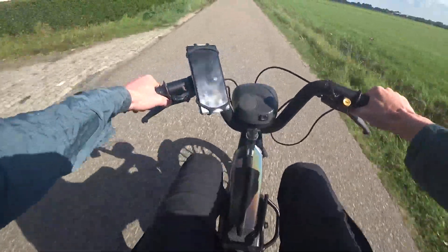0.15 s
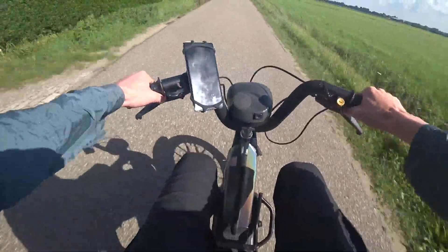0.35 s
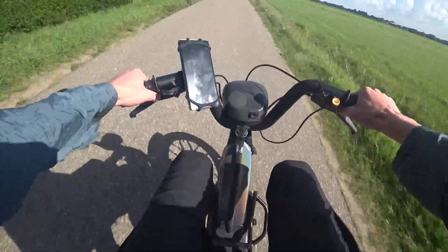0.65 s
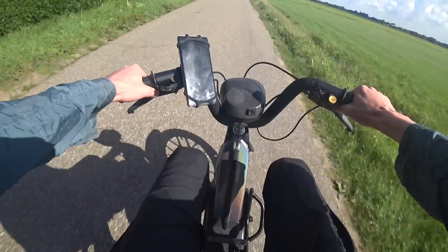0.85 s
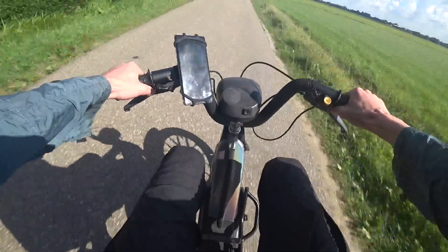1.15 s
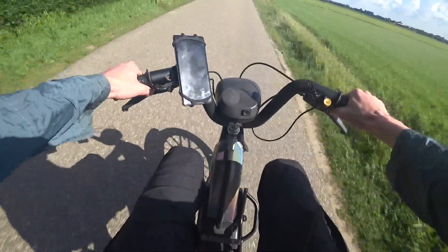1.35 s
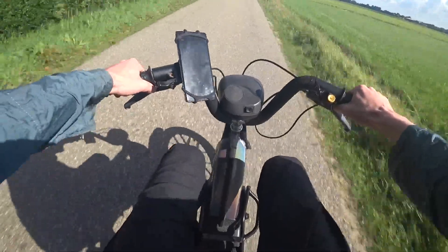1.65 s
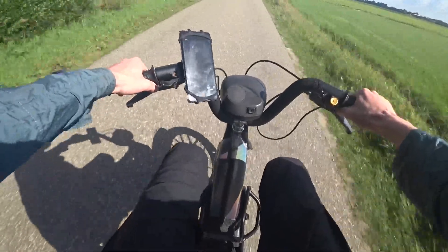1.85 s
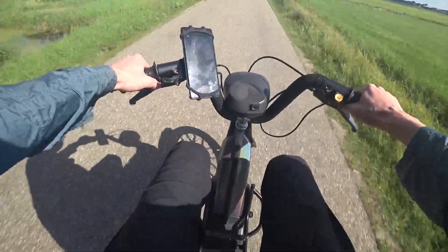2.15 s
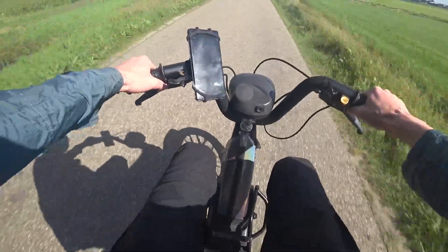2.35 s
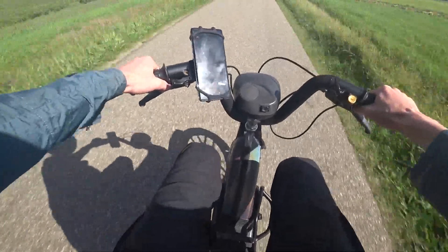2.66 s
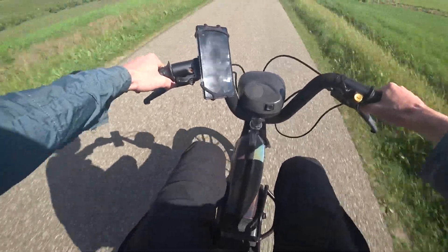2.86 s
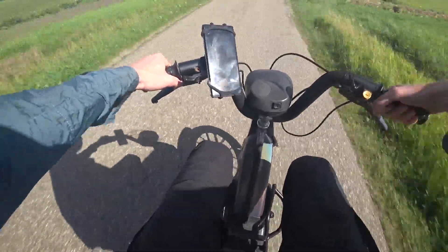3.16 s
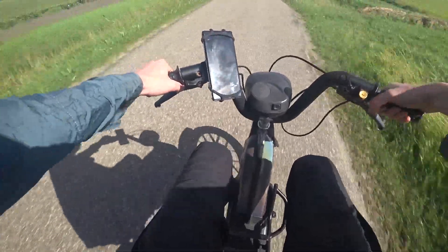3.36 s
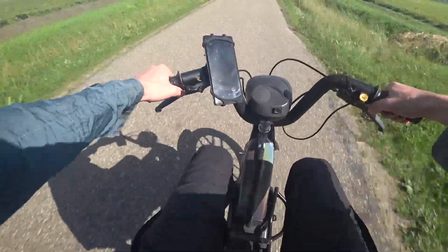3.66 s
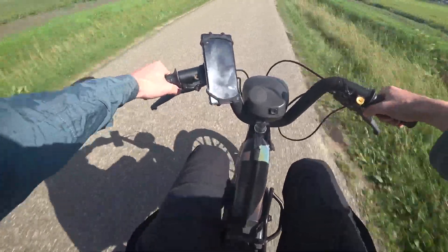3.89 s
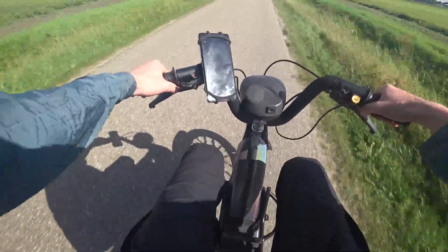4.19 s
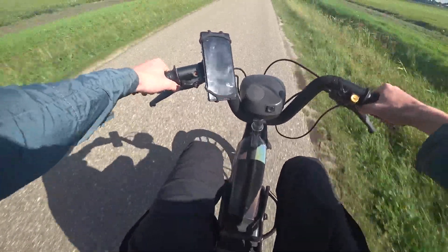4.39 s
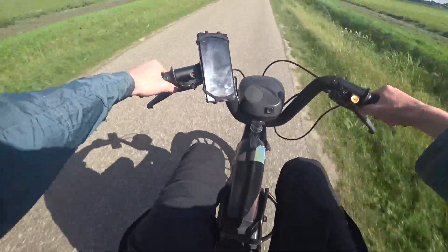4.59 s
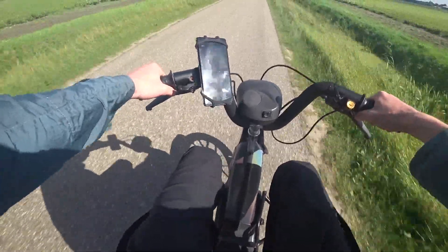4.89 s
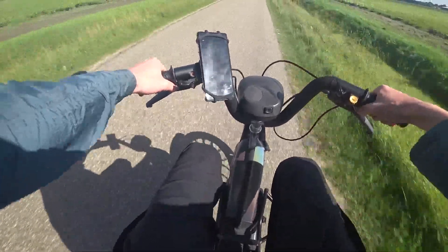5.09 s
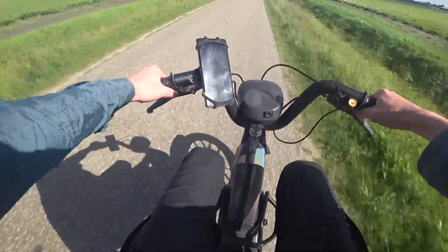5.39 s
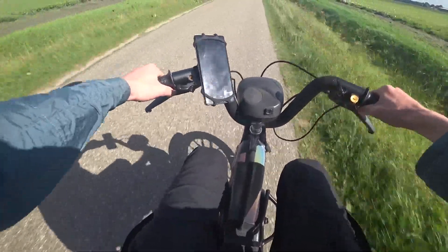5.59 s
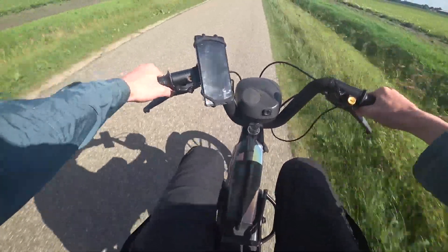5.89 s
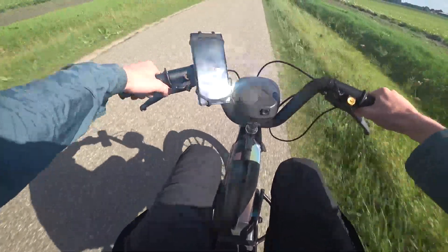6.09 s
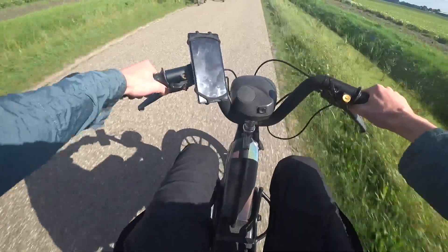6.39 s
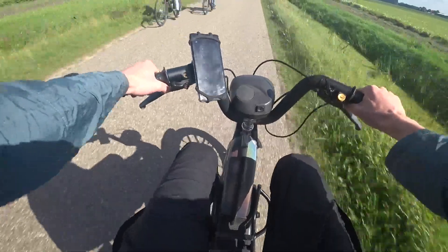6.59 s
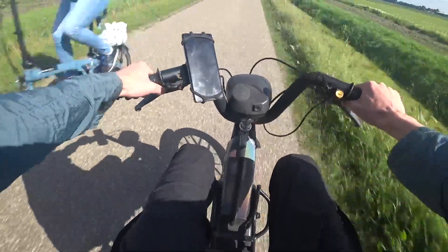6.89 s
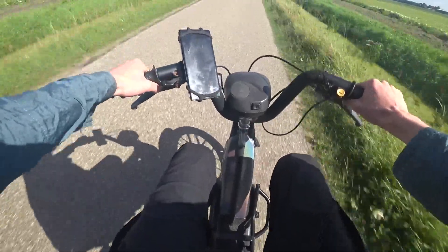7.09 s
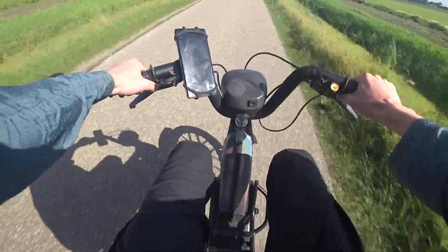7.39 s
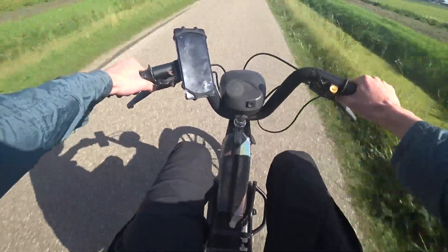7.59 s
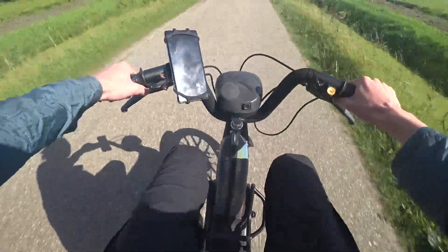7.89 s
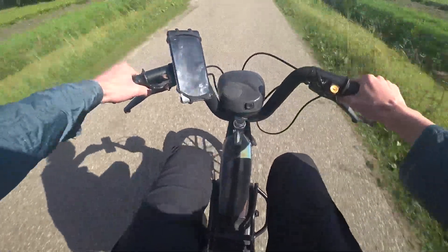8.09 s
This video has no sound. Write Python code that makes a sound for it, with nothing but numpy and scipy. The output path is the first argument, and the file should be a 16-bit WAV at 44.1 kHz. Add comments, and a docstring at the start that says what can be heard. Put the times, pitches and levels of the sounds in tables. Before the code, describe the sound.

A tuned two-stroke moped is heard from the rider's chest on an open path, close, dry and wide, with the engine sounding diffuse between left and right. From 0 to 3.1 s it holds a fast, nasal, buzzing drone, very slightly rising, with metallic rasp, hiss and a thin gear whine around 1.1 kHz. Deep wind rumble and blustery buffets push over it, strongest in the first two seconds. At about 3.2 s the throttle shuts: the exhaust fades and stumbles as the pitch drops quickly. Around 3.6 to 3.8 s it reopens with a few small, rough pops. A lower, duller note holds until about 6 s, in calmer but still rumbling wind. Gusts return from 5.8 s, with a soft low thump, while the revs climb and the bright rasp comes back by 7 s, staying steady, just below the opening pitch, to the end near 8.2 s.

```python
"""Narrow path, heard from a moped rider's chest: a tuned two-stroke runs flat out.
The throttle shuts briefly; revs sag, hold, climb again. Exhaust is summed firing harmonics plus gas noise,
the engine rasp is pulse-driven, the drive whines with road speed, wind is gusting coloured noise.
Two microphone ports, built from side and mid, hear most of it in opposite phase."""
import sys
import numpy as np
from scipy import signal
from scipy.fft import rfft, irfft, next_fast_len
from scipy.io import wavfile
from scipy.ndimage import map_coordinates

SR = 44100
rng = np.random.default_rng(int(sys.argv[2]) if len(sys.argv) > 2 else 0)


def generate_wav(sig):
    """Save sig (samples, or channels by samples) to the path in sys.argv[1] as 16-bit PCM at SR."""
    pcm = np.round(np.clip(np.atleast_2d(sig).T, -1, 1) * 32767).astype(np.int16)
    wavfile.write(sys.argv[1], SR, pcm)


N = 363811

# wind common to both ports: centre_hz, side_db, mid_db
RUMBLE_SPECTRUM = [(8, -12, 4), (15, -10, 7.5), (30, -9, 4), (55, -11, -4.5), (90, -16, -13),
                   (140, -25, -23), (220, -33, -29), (600, -50, -44), (2000, -80, -80)]
# wind differing between the ports: centre_hz, side_db, mid_db
BUFFET_SPECTRUM = [(15.4, -14, 5), (55, -3.5, -17), (90, 0, -27), (140, -7, -44), (220, -15.5, -36),
                   (503, -15, -63), (2000, -94, -90)]
# passing air: centre_hz, side_db, mid_db
RUSH_SPECTRUM = [(100, -32, -47), (215, -21, -31.5), (403, -18.5, -29), (615, -18, -27), (960, -10, -28.5),
                 (1300, -20, -40), (1600, -17, -30), (1890, -28, -36.5), (2580, -34, -41),
                 (5160, -36.5, -39.5), (11000, -55.5, -53)]
# low wind flutter: centre_hz, side_db, mid_db
FLUTTER_SPECTRUM = [(29.81, -42, -30), (81.6, -32, -9), (126, -24, -17.5), (214, -30, -25.5),
                    (350, -32, -26.5), (600, -50, -29.5), (2000, -80, -84)]
# flutter level: time_s, level_db
FLUTTER_LEVEL = [(0, -4.5), (1.8, -4.5), (3, 2), (3.6, -0.5), (5, 2), (7, -1.5), (8.25, -0.5)]
# gusts, levels before spectrum and trim: start_s, length_s, buffet_db, rumble_db
GUSTS = [(-.05, .2, 2, -14), (.15, 0.31, 8.5, -3), (0.752, 0.12, 5.5, -5), (1.2, 0.13, 6.5, -12),
         (1.32, 0.21, 11, -16), (1.693, 0.18, 7, -10), (2.59, .2, 3, -1.5), (2.85, 0.27, -7, -3),
         (4.35, 0.15, -9, 1), (5.24, .2, -4, -5), (5.79, 0.14, 3, 5), (6.118, .18, 7.5, -5),
         (6.48, .14, 5, -5), (6.793, 0.24, 10.5, -9), (7.056, 0.13, 5, -16), (7.68, 0.13, -2, 2),
         (7.801, 0.26, 4.5, 0.5), (8.153, 0.17, 3, 4)]
# low wind thumps: start_s, peak_db
THUMPS = [(1.97, -32), (2.44, -33), (4.16, -27), (5.87, -18), (6.92, -28.5), (7.52, -28)]
# road speed as gear mesh rate: time_s, mesh_hz
MESH_RATE = [(0, 1097), (.5, 1101), (2, 1134), (3.15, 1153), (4, 1110), (4.5, 1083), (5.3, 1062), (6, 1030),
             (7.6, 1044), (8.25, 1078)]
# single hard firings around the throttle reopening: start_s, peak_db
POPS = [(3.603, -28), (3.641, -22), (3.765, -25), (3.802, -27)]
# engine case and hiss: centre_hz, side_db, mid_db
RASP_SPECTRUM = [(1280, -25.5, -57), (2110, -28, -33.5), (2540, -35, -38), (2730, -51, -32.5),
                 (3330, -22.5, -39), (3770, -38.5, -40.5), (4990, -24, -26.5), (5550, -30, -26),
                 (5550, -20, -27.5), (6160, -36, -34.5), (6850, -37, -29.5), (7160, -34, -29.5),
                 (9520, -60, -48.5), (11100, -55, -49)]
# cylinder fin modes: mode_hz, width_hz, gain_db
FIN_MODES = [(2020, 110, -31), (2534, 42, -30), (2851, 39, -28), (3570, 38, -37), (4147, 43, -31.5),
             (4846, 130, -29), (5174, 110, -34.5), (6610, 140, -29.5)]
# engine speed: time_s, firing_hz
REVS = [(0.08, 117.1), (3.0, 119.0), (3.18, 118.8), (3.25, 116.3), (3.29, 113.1), (3.43, 107.4),
        (3.59, 102.6), (3.65, 104.6), (3.88, 105.3), (3.99, 106.2), (4.26, 107.0), (4.96, 107.6),
        (5.52, 107.2), (6.08, 108.3), (6.3, 110.5), (6.78, 114.3), (7.2, 115.4), (8.15, 115.3)]
# firing harmonics on and off the pipe: order, side_on_db, mid_on_db, side_off_db, mid_off_db
FIRING_ORDERS = [(4, -36.9, -39.9, -53.0, -50.2), (5, -32.2, -43.8, -45.2, -50.9),
                 (6, -34.5, -53.5, -38.3, -45.7), (7, -25.1, -47.2, -43.8, -65.7),
                 (8, -32.3, -37.0, -25.1, -42.4), (9, -34.7, -35.5, -35.0, -32.8),
                 (10, -22.8, -30.1, -38.1, -35.6), (11, -34.6, -43.9, -26.8, -32.4),
                 (12, -27.2, -42.8, -46.0, -54.4), (13, -27.1, -45.7, -39.7, -54.7),
                 (14, -34.1, -48.2, -41.4, -56.4), (15, -45.9, -58.1, -48.3, -61.5),
                 (16, -51.2, -64.0, -54.2, -68.0)]
# exhaust gas noise: centre_hz, side_db, mid_db
GAS_SPECTRUM = [(300, -40, -50), (650, -21, -33), (830, -14, -31), (1000, -19, -32), (1300, -18, -32),
                (1520, -15, -31), (1700, -20, -35), (2200, -50, -60)]
# narrow pipe peaks and dips: centre_hz, width_hz, side_db, mid_db
PIPE_BUMPS = [(447, 14.3, -2, -5.5), (667, 12, 5, 6), (888, 17, 7.5, 0.5), (926, 12, -2, -3),
              (993, 20.5, 2, 4.5), (1031, 11, -3, -5.5), (1106, 12.5, -10, -9), (1250, 30, -14, -8),
              (1428, 7.9, 3, 3.5), (1677, 14, 3, 5)]

# wind between gusts, gust edge time, rush gain per dB of buffet
CALM_BUFFET_DB, CALM_RUMBLE_DB, CALM_RUSH_DB = -9, -1.5, -1.5
GUST_EDGE_S, RUSH_DB_PER_BUFFET_DB = 0.038, 0.15
# throttle: closing starts and lasts, reopening starts and lasts
SHUT_S, CLOSE_S, REOPEN_S, OPEN_S = 3.17, 0.071, 3.55, 0.11
# exhaust: open level, change when shut, further fade as the engine starves
EXHAUST_DB, EXHAUST_SHUT_DB, STARVE_DB_PER_S = 0.78, -1, -29
# upper harmonics: open gain, change when shut; extra change of odd harmonics when shut
BARK_DB, BARK_SHUT_DB, ODD_SHUT_DB = 0.5, -2, -12
# rasp: 0 dB at FULL_REVS_HZ, change when shut
RASP_DB_PER_HZ, FULL_REVS_HZ, RASP_SHUT_DB = 0.4343, 116.56, -1
TOP_HZ = 11050


def amp(db):
    """Decibels to gain."""
    return 10 ** (np.asarray(db) / 20)


def unit(x):
    """Scale to rms 1."""
    return x / np.sqrt(np.mean(x ** 2) + 1e-20)


def curves(rows):
    """Interpolate each column after the time to one value per sample."""
    time_s, *cols = np.transpose(rows)
    return [np.interp(np.arange(N) / SR, time_s, col) for col in cols]


def wobble(rate_hz):
    """Smooth random curve, rate_hz knots a second."""
    knots = rng.standard_normal(int(N * rate_hz / SR) + 4)
    return map_coordinates(knots, [np.arange(N) * rate_hz / SR])


def filtered(x, response):
    """Apply a complex frequency response to x."""
    m = next_fast_len(N + SR // 2)
    return irfft(rfft(x, m) * response(np.fft.rfftfreq(m, 1 / SR)), m)[..., :N]


def resonance(hz, centre_hz, width_hz):
    """Response of one damped mode."""
    return 1j * hz * width_hz / (centre_hz ** 2 - hz ** 2 + 1j * hz * width_hz)


def noise():
    """Unrelated white noise for side and mid."""
    return rng.standard_normal((2, N))


def ringing_noise(centre_hz, width_hz):
    """White noise through a mode twice, at rms 1."""
    return unit(filtered(rng.standard_normal(N), lambda hz: resonance(hz, centre_hz, width_hz) ** 2))


def ports(x, spectrum, flip_hz=1680):
    """Colour x into (side, mid) a quarter cycle apart; right leads below flip_hz, left above."""
    centre_hz, *cols = np.transpose(spectrum)

    def response(hz):
        gains = amp([np.interp(np.log(hz + 1), np.log(centre_hz), col) for col in cols])
        return gains * np.array([1j * np.sign(hz - flip_hz), np.ones_like(hz)])

    return filtered(x, response)


def blows(rows, rise_s):
    """Envelope of short pushes, each swelling to its peak in rise_s and dying away."""
    t = np.arange(N) / SR
    envelope = np.zeros(N)
    for start_s, peak_db in rows:
        age = np.maximum(t - start_s, 0) / rise_s
        envelope += amp(peak_db) * age * np.exp(1 - age)
    return envelope


def gusts():
    """Buffet and rumble levels in dB: each gust's power rises, holds and falls on top of the calm."""
    t = np.arange(N) / SR
    power = np.outer(amp([CALM_BUFFET_DB, CALM_RUMBLE_DB]) ** 2, np.ones(N))
    for start_s, length_s, buffet_db, rumble_db in GUSTS:
        onset = np.tanh((t - start_s) / GUST_EDGE_S)
        release = np.tanh((t - start_s - length_s) / GUST_EDGE_S)
        power += np.outer(amp([buffet_db, rumble_db]) ** 2, (onset - release) / 2)
    return 10 * np.log10(power)


def wind(thump_hz=65, thump_width_hz=90, eddy_db=2, buffet_trim_db=-2):
    """Turbulence at the ports: shared rumble, differing buffet, rushing air, flutter and thumps."""
    buffet_db, rumble_db = gusts()
    rush_db = CALM_RUSH_DB + RUSH_DB_PER_BUFFET_DB * (buffet_db - CALM_BUFFET_DB)
    eddies = wobble(26)
    rumble = ports(noise(), RUMBLE_SPECTRUM) * amp(rumble_db + wobble(12))
    buffet = ports(noise(), BUFFET_SPECTRUM) * amp(buffet_db + eddy_db * eddies + buffet_trim_db)
    rush = ports(noise(), RUSH_SPECTRUM) * amp(rush_db + 1.36 * eddies)
    # flutter level is independent of the gusts
    flutter = ports(noise(), FLUTTER_SPECTRUM) * amp(curves(FLUTTER_LEVEL)[0])
    thumps = ringing_noise(thump_hz, thump_width_hz) * blows(THUMPS, rise_s=0.0087)
    return rumble + buffet + rush + flutter + np.outer([0, 1], thumps)  # thumps: mid only


def drive(revs_db, shut, case_hz=1120, case_width_hz=165, churn_db=-34, side_db=4,
          whine_db=-29, octave_db=-51, ring_hz=1128, ring_width_hz=90, coast_db=-6):
    """Gear mesh whines at road speed, loudest under load and near the case ring; churning rings the case."""
    mesh_hz, = curves(MESH_RATE)
    phase = 2 * np.pi * np.cumsum(mesh_hz * (1 + .0012 * wobble(40))) / SR
    ring = np.abs(resonance(mesh_hz, ring_hz, ring_width_hz)) ** 2
    whine_level_db = whine_db + 1.1 * revs_db + coast_db * shut + wobble(20)
    whine = ring * amp(whine_level_db) * np.sin(phase)
    octave_level_db = octave_db + revs_db + coast_db * shut + 1.3 * wobble(25)
    octave = amp(octave_level_db) * np.sin(2 * phase)
    churn = ringing_noise(case_hz, case_width_hz) * amp(churn_db + revs_db)
    gears = np.sqrt(2) * (whine + octave) + churn
    return ports(gears, [(case_hz, side_db, 0), (2 * case_hz, -2, 0)])


def throttle():
    """Throttle closure (0-1) and starved time in s, weighted by closure."""
    t = np.arange(N) / SR
    closing = np.clip((t - SHUT_S) / CLOSE_S, 0, 1)
    shut = closing * np.clip(1 - (t - REOPEN_S) / OPEN_S, 0, 1)
    return shut, shut * np.clip(t - SHUT_S, 0, REOPEN_S - SHUT_S)


def pops(pipe_hz=900, pipe_width_hz=450, mid_db=-11):
    """Stray hard firings bark through the pipe: short bursts of resonant noise."""
    bark = ringing_noise(pipe_hz, pipe_width_hz)
    return ports(bark * blows(POPS, rise_s=0.0035), [(pipe_hz, 0, mid_db)])


def firing_pulses(turns):
    """One band-limited impulse per firing, at fractional sample times and uneven strength."""
    firings = np.interp(np.arange(1, int(turns[-1])), turns, np.arange(N))
    size = amp(.5 * rng.standard_normal(len(firings)))
    taps = firings.astype(int)[:, None] + np.arange(-7, 9)
    spikes = size[:, None] * np.sinc(taps - firings[:, None])
    return unit(np.bincount(np.clip(taps, 0, N - 1).ravel(), spikes.ravel(), N))


def rasp(turns, level_db, hiss_share=0.51):
    """Each firing rattles the case and rings the cylinder fins; hiss pulses along."""
    pulses = firing_pulses(turns)
    t = np.arange(SR // 20) / SR
    case = rng.standard_normal(len(t)) * amp(-60 * t / .05) * (1 - np.exp(-t / .004))
    rattle = unit(signal.fftconvolve(pulses, case)[:N])
    # partly shared between side and mid
    hiss = rng.standard_normal(N) + .45 * noise()
    hiss = unit(hiss * (1 + .15 * np.cos(2 * np.pi * turns - 2)))
    mix = np.sqrt(1 - hiss_share) * rattle + np.sqrt(hiss_share) * hiss
    body = ports(mix, RASP_SPECTRUM) * amp(level_db)

    # a fin sings when a firing harmonic meets its mode
    def fin_response(hz):
        return sum(amp(gain_db) * resonance(hz, mode_hz, width_hz) ** 2
                   for mode_hz, width_hz, gain_db in FIN_MODES)

    fins = ports(filtered(pulses, fin_response), [(3500, 1.6, -2.0), (6500, -2, 1.2)])
    # fins need hard burns, so they fade faster
    return body + fins * amp(1.4 * level_db)


def pipe_db(hz):
    """Side and mid gain in dB that the pipe's peaks and dips give a harmonic at hz."""
    grid_hz = np.arange(2000)
    bumps_db = np.zeros((2, len(grid_hz)))
    for centre_hz, width_hz, side_db, mid_db in PIPE_BUMPS:
        bumps_db += np.outer([side_db, mid_db], np.exp(-((grid_hz - centre_hz) / width_hz) ** 2))
    return np.array([np.interp(hz, grid_hz, row) for row in bumps_db])


def exhaust(revs_hz, turns, level_db, bark_db, odd_db, rough=0.093, wander_db=.5,
            off_pipe_hz=107.1, on_pipe_hz=112, gas_off_db=-12, gas_on_db=-9):
    """Firing harmonics, rebalanced as revs enter the tuned pipe's range, plus pulsing gas noise."""
    on_pipe = np.clip((revs_hz - off_pipe_hz) / (on_pipe_hz - off_pipe_hz), 0, 1)
    note = np.zeros((2, N))
    for order, side_on_db, mid_on_db, side_off_db, mid_off_db in FIRING_ORDERS:
        gain_on = amp([[side_on_db], [mid_on_db]])
        gain_off = amp([[side_off_db], [mid_off_db]])
        gain = on_pipe * gain_on + (1 - on_pipe) * gain_off
        # an open throttle sharpens the pulse, lifting the upper harmonics
        upper = np.clip((order - 10) / 2, 0, 1)
        phase = 2 * np.pi * (order * turns + rng.random())
        colour_db = pipe_db(order * revs_hz) + upper * bark_db + order % 2 * odd_db
        tone = np.array([np.sin(phase), np.cos(phase)])
        note += np.sqrt(2) * gain * amp(colour_db + wander_db * wobble(10)) * tone
    # turbulent gas swells once per firing
    puffs = unit(rng.standard_normal(N) * (1 + .5 * np.cos(2 * np.pi * turns)))
    gas = ports(puffs, GAS_SPECTRUM) * amp(gas_off_db + (gas_on_db - gas_off_db) * on_pipe)
    # burns vary in strength; a starved engine stumbles
    starved = np.clip(-level_db / 10, 0, 1)
    return (note + gas) * amp(level_db + 2 * starved * wobble(45)) * (1 + rough * wobble(115))


def scene():
    """Sum wind, drive and engine; turn side and mid into left and right."""
    revs_hz, = curves(REVS)
    shut, starved_s = throttle()
    exhaust_db = EXHAUST_DB + EXHAUST_SHUT_DB * shut + STARVE_DB_PER_S * starved_s
    bark_db = BARK_DB + BARK_SHUT_DB * shut
    revs_db = RASP_DB_PER_HZ * (revs_hz - FULL_REVS_HZ)
    # the crank never turns quite evenly
    turns = np.cumsum(revs_hz * (1 + 0.000613 * wobble(16) + 0.001193 * wobble(110))) / SR
    background = wind() + drive(revs_db, shut)
    engine = pops() + rasp(turns, revs_db + RASP_SHUT_DB * shut)
    engine += exhaust(revs_hz, turns, exhaust_db, bark_db, ODD_SHUT_DB * shut)
    side, mid = background + engine
    return np.array([mid + side, mid - side])


def record(dry):
    """Round off the strongest peaks, then cut everything from TOP_HZ up."""
    rounded = dry / (1 + np.abs(dry / .97) ** 6) ** (1 / 6)
    return filtered(rounded, lambda hz: hz < TOP_HZ)


dry = scene()
out = record(dry)
generate_wav(out)
```